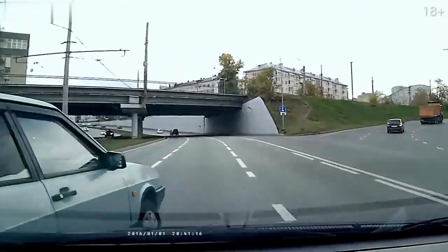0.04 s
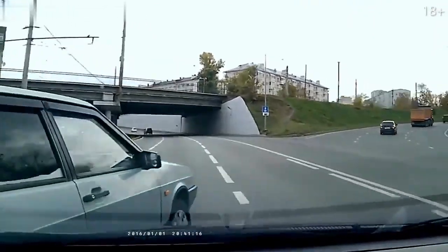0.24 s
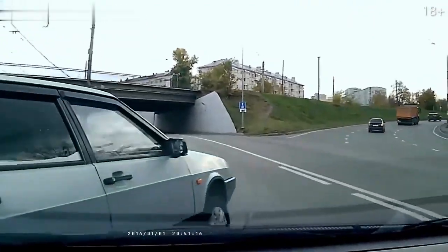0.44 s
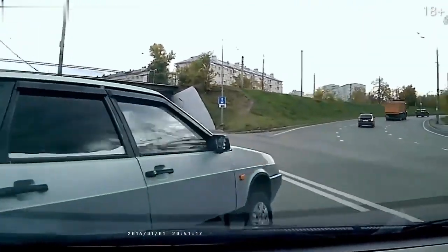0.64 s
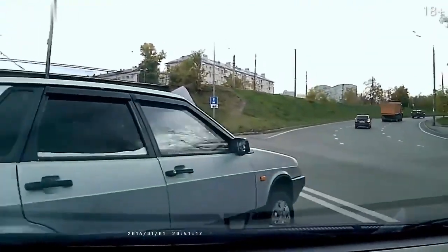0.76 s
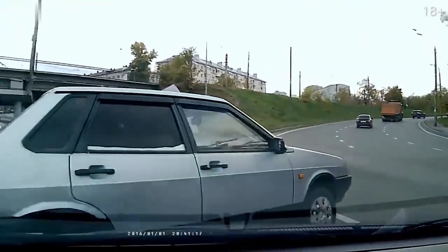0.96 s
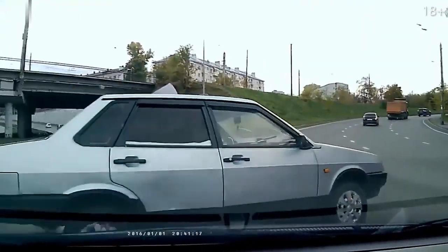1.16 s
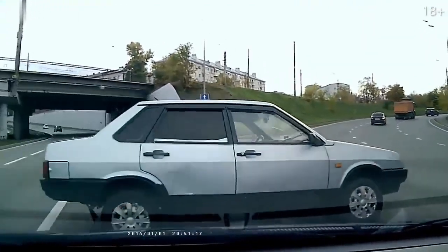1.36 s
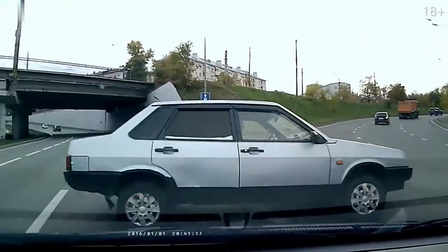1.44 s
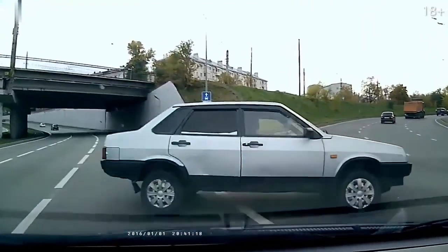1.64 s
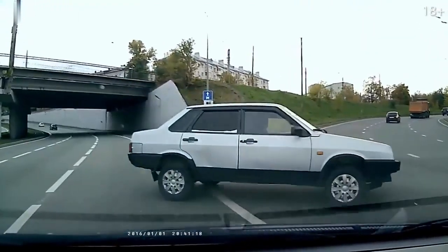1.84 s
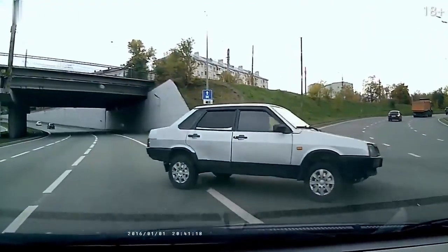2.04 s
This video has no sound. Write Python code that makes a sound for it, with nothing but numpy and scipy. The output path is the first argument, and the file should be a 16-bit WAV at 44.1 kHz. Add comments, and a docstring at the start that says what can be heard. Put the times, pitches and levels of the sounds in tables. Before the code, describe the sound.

A loud collision cuts through the road and engine rumble in a car cabin, crushing metal and snapping plastic with a deep boom that distorts the microphone. Tyres skid and squeal afterwards, with scattered knocks and rattles, gradually easing.

```python
"""Inside a moving car that runs into the side of another and shoves it round.
Over the rumble of road and engine, the bumper crumples, metal panels crush, plastic snaps, the cabin
rings and the body booms, overloading the microphone. Sliding tyres scrub, squeal and judder.
Bent trim knocks and rattles as the cars part, and one small fragment pings."""
import sys
import numpy as np
from scipy import signal
from scipy.fft import rfft, irfft
from scipy.io import wavfile
from scipy.ndimage import uniform_filter1d

SR = 44100
rng = np.random.default_rng(int(sys.argv[2]) if len(sys.argv) > 2 else 0)


def file_out(sig):
    """Save sig as 16-bit WAV at sys.argv[1]."""
    # one column per channel
    cols = np.atleast_2d(sig).T
    # limit, then scale
    lim = np.clip(cols, -1, 1)
    pcm = np.round(lim * 32767).astype(np.int16)
    wavfile.write(sys.argv[1], SR, pcm)


N = 92610  # 2.1 seconds
T = np.arange(N) / SR


def from_db(db):
    """Turn decibels into a number to multiply by."""
    return 10 ** (np.asarray(db) / 20)


def rms_one(x):
    """Scale a signal so its average power is 1."""
    return x / np.sqrt(np.mean(x ** 2) + 1e-20)


def in_time(rows):
    """Join a table's rows with straight lines in time; the first and last values hold."""
    times, *columns = np.transpose(rows)
    return [np.interp(T, times, column) for column in columns]


def drift(rate_hz):
    """A smooth random wobble of about size 1; a higher rate wobbles faster."""
    step, warm_up = 40, 2000
    r = np.exp(-2 * np.pi * rate_hz * step / SR)
    chance = rng.standard_normal(N // step + warm_up + 2)
    slow = signal.lfilter([1], [1, -2 * r, r * r], chance)[warm_up:]
    return np.interp(np.arange(N) / step, np.arange(len(slow)), rms_one(slow))


def colour(x, points):
    """Give a sound its colour: the balance of low and high frequencies drawn by a table."""
    size = 2 ** 17
    hz = np.maximum(np.arange(size // 2 + 1) * SR / size, 1)
    knots, db = np.transpose(points)
    bass_cut = np.minimum(hz / knots[0], 1) ** 2
    gain = rms_one(from_db(np.interp(np.log(hz), np.log(knots), db)) * bass_cut)
    # make the filter ring only after a click, never before it
    cepstrum = irfft(np.log(gain + 1e-9))
    cepstrum[1:size // 2] *= 2
    cepstrum[size // 2 + 1:] = 0
    return irfft(rfft(x, size) * np.exp(rfft(cepstrum)))[:N]


def noise(points):
    """Coloured noise whose slow swells are evened out."""
    x = colour(rng.standard_normal(N), points)
    return x / np.sqrt(uniform_filter1d(x * x, size=4000) + 1e-12)


def grains(per_s, spread_db):
    """Random clicks of uneven size."""
    sizes = from_db(spread_db * np.minimum(rng.exponential(1, N), 4))
    signs = rng.choice([-1, 1], N)
    return rms_one(sizes * signs * (rng.random(N) < per_s / SR))


def strikes(rows):
    """One click for each (time [s], level [dB])."""
    out = np.zeros(N)
    for time, db in rows:
        out[int(time * SR)] += from_db(db)
    return out


def ring(x, hz, ring_s):
    """Each click starts a pure tone that fades by 60 dB in ring_s seconds."""
    r, w = from_db(-60 / (ring_s * SR)), 2 * np.pi * hz / SR
    return signal.lfilter([0, np.sin(w)], [1, -2 * r * np.cos(w), r * r], x + 1e-18)


def burst(start, rise, hold, fade):
    """A loudness shape that rises, then fades from start + hold on; all in seconds."""
    return np.clip((T - start) / rise, 0, 1) * np.exp(-np.maximum(T - start - hold, 0) / fade)


# colour of the cabin rumble: (frequency [Hz], level [dB])
ROAD_COLOUR = [(17, 3), (26, 1.5), (36, -1), (48, 2), (62, -11.5), (85, -20.5), (160, -17.5), (250, -31),
               (340, -22), (480, -38.5), (900, -38), (2000, -52.5), (4500, -63), (6500, -64.5),
               (9000, -74.5), (14000, -70)]
# its loudness: (time [s], level [dB])
ROAD_LOUDNESS = [(0, -28), (.2, -30.5), (.45, -27), (1.2, -26), (1.5, -29), (2.1, -30)]


def road():
    """Road and engine rumble through the cabin."""
    return from_db(in_time(ROAD_LOUDNESS)[0]) * noise(ROAD_COLOUR)


# loudness of the scrubbing tyres: (time [s], rumble level [dB], rasp level [dB])
SCRUB_LOUDNESS = [(.22, -32, -74), (.36, -24.5, -50.5), (.49, -36, -43), (.58, -26.5, -38), (.8, -26, -38),
                  (1.05, -28.5, -41.5), (1.25, -29, -39.5), (1.5, -34.5, -45), (1.72, -34, -41.5),
                  (1.88, -39, -48.5), (2.1, -47, -51.5)]
# colours of the rumble and the rasp: (frequency [Hz], level [dB])
RUMBLE_COLOUR = [(50, -1), (90, 7), (125, 13), (165, 6.5), (210, 8), (270, -10.5), (350, -10), (480, -28),
                 (800, -57)]
RASP_COLOUR = [(300, 1), (520, 3), (750, 1), (1100, 0), (1300, -3), (1600, -6.5), (2200, -19),
               (2900, -14.5), (4000, -27), (5000, -40.5), (7000, -67), (14000, -62.5)]


def scrub():
    """Rubber on asphalt rumbles from the start and adds a gritty rasp as it is dragged sideways."""
    rumble_db, rasp_db = in_time(SCRUB_LOUDNESS)
    rumble = from_db(rumble_db) * noise(RUMBLE_COLOUR)
    grit = from_db(rasp_db) * grains(per_s=6000, spread_db=1.0)
    return rumble + colour(grit, RASP_COLOUR)


# colour of the crumpling bumper: (frequency [Hz], level [dB])
CRUMPLE_COLOUR = [(250, 9), (700, 0.5), (1400, -4), (2200, -7.5), (3400, -7.5), (4600, -28), (7000, -38),
                  (14000, -41)]


def bumper():
    """The bumper crumples with a light crackle at the first touch."""
    level = from_db(-30.5) * burst(start=.208, rise=.0074, hold=.026, fade=.0094)
    return colour(level * grains(per_s=3500, spread_db=0.5), CRUMPLE_COLOUR)


# loudness of the buckling metal: (time [s], level [dB])
BUCKLE_LOUDNESS = [(.205, -63.5), (.216, -33.5), (.228, -30), (.238, -22.5), (.2455, -4), (.251, -7),
                   (.256, -14.5), (.261, -9.5), (.268, -22.5), (.285, -25), (.32, -32), (.37, -36),
                   (.48, -61.5), (.6, -76)]
# its colour: (frequency [Hz], level [dB])
BUCKLE_COLOUR = [(90, -8), (150, -4), (280, 5.5), (400, -0.5), (750, -1.5), (1100, -0.5), (1600, -8.5),
                 (2000, -20), (2800, -20), (4500, -30.5), (8000, -41.5), (14000, -48)]


def crush():
    """Sheet metal buckles in dense clicks; they and the hardest hit set the cabin ringing."""
    buckles = from_db(in_time(BUCKLE_LOUDNESS)[0]) * grains(per_s=1800, spread_db=2.0)
    ringing = from_db(-10) * buckles.std() * rms_one(cabin_ring(buckles))
    hardest_hit = strikes([(.2445, -24.5)])
    return colour(buckles, BUCKLE_COLOUR) + ringing + cabin_ring(hardest_hit)


# cabin resonances, the tones it rings at: (pitch [Hz], level [dB], ring time [s])
CABIN_TONES = [(281, 8.5, 0.19), (346, 4, 0.41), (437.7, 0, 0.32), (498, -9, 0.1), (519, -3, 0.45),
               (674, 10, 0.13), (752, 9.5, 0.19), (905, 2, 0.16), (961, 12, 0.093), (1218, -34, 0.067),
               (1227, -4.5, 0.4), (1537, -9, 0.1), (1750, -15, 0.36), (2300, -9.5, .1), (2930, 2, .08)]


def cabin_ring(hits):
    """The crash sets off ringing tones in the cabin; every second tone starts the opposite way."""
    return sum(from_db(db) * ring(hits, hz, ring_s) * (-1) ** k
               for k, (hz, db, ring_s) in enumerate(CABIN_TONES))


# plastic breaking: (time [s], level [dB])
PLASTIC_SNAPS = [(.2165, -46), (0.227, -45), (0.2353, -15.5), (0.2438, -18), (0.257, -27), (.2645, -35),
                 (0.273, -30)]
# colour of a snap: (frequency [Hz], level [dB])
PLASTIC_COLOUR = [(1500, 9.5), (4000, -13), (5800, -6), (8000, -25), (11000, -9), (13500, -10),
                  (14500, -9.5)]


def snaps():
    """Brittle plastic breaks with short, bright cracks."""
    level = sum(from_db(db) * burst(time, rise=.00035, hold=.00065, fade=.0025)
                for time, db in PLASTIC_SNAPS)
    return colour(level * rng.standard_normal(N), PLASTIC_COLOUR)


# heavy blows on the car body: (time [s], level [dB])
BODY_BLOWS = [(.235, -15), (.2505, -7.5), (.276, -14.5), (.296, -12.5), (.322, -13)]
# the body's deep tones: (pitch [Hz], level [dB], ring time [s])
BODY_TONES = [(23.8, -3, 0.17), (36.9, 3, .3), (72.3, -3, 0.21), (99, -11, .25), (123.9, -7, 0.57),
              (138.7, -9.5, 0.58), (197, -30.5, 0.22)]


def boom(soften_above_hz=300):
    """Soft, heavy blows shake the body and the cabin air."""
    soften = signal.butter(1, soften_above_hz, fs=SR, output="sos")
    push = signal.sosfilt(soften, strikes(BODY_BLOWS) + 1e-18)
    return sum(from_db(db) * ring(push, hz, ring_s) for hz, db, ring_s in BODY_TONES)


# course of the squeal: (time [s], base pitch [Hz], level [dB], overtone boost [dB])
SQUEAL_PATH = [(.3, 1100, -65, -19), (.4, 1092, -44.5, -0.5), (.55, 1077, -47.5, -23),
               (.85, 1124, -41, -9.5), (1.08, 1070, -42, -3), (1.2, 966, -43, 3.5), (1.28, 1110, -37.5, -2),
               (1.34, 1100, -39.5, -3), (1.42, 958, -43.5, 6), (1.58, 944.5, -42.5, -0.5),
               (1.72, 913.6, -37.5, -7), (1.84, 959, -45.5, -3), (1.92, 978, -41, -7),
               (2.02, 1020, -46.5, -7.5), (2.1, 984, -49, -8)]
# ribs of the tyre tread: (pitch [times the base pitch], level [dB])
TREAD_RIBS = [(1, 1.5), (0.88, -3), (1.045, -10), (.89, -9)]
# tones at 1, 2, 3 and 4 times a rib's pitch: (level [dB])
RIB_HARMONICS = [-2.5, -11, -15.5, -29]


def squeal():
    """Tread ribs stick and slip on the road, each singing at its own unsteady pitch."""
    hz, db, boost_db = in_time(SQUEAL_PATH)
    out = 0
    for ratio, rib_db in TREAD_RIBS:
        wobble = 1 + .022 * drift(rate_hz=220) + .011 * drift(rate_hz=18)
        phase = 2 * np.pi * np.cumsum(hz * ratio * wobble) / SR
        tone = sum(from_db(level + boost_db * (k > 0)) * np.sin((k + 1) * phase)
                   for k, level in enumerate(RIB_HARMONICS))
        flutter_db = 4.5 * drift(rate_hz=68)
        out += tone * from_db(db + rib_db + flutter_db)
    return out


# knocks of bent trim: (time [s], clatter level [dB], clunk level [dB], rise [s], hold [s], fade [s])
TRIM_KNOCKS = [(0.493, -47, -42, 0.0011, 0.0053, 0.0058), (1.076, -41, -62, 0.0013, 0.0033, 0.015),
               (1.109, -51, -54, 0.0016, .003, 0.0089), (1.171, -37, -19, 0.0013, 0.0065, 0.011),
               (1.212, -69, -31, 0.0022, 0.014, 0.015), (1.359, -38.5, -17.5, 0.0027, 0.0096, 0.012),
               (1.382, -43, -30, 0.0022, .005, 0.01), (1.425, -38, -29, 0.011, 0.037, 0.016),
               (1.613, -51.5, -36.5, 0.0099, 0.034, 0.017), (1.713, -36.5, -32, 0.0042, 0.018, 0.016),
               (1.756, -48, -41.5, 0.015, .025, 0.026), (1.795, -42, -42, 0.0094, 0.028, 0.011),
               (1.851, -46, -44, 0.0078, .016, 0.014), (1.925, -37, -42, 0.0037, 0.0094, 0.014),
               (2.038, -49.5, -41, 0.0054, 0.012, 0.01)]
# colours of the clatter and the clunk: (frequency [Hz], level [dB])
CLATTER_COLOUR = [(700, 7), (1600, 0), (3000, -8), (4200, -9), (5500, -13), (7700, -21), (9500, -16.5),
                  (12000, -21.5), (15000, -20)]
CLUNK_COLOUR = [(100, -11), (200, 2.5), (350, 4), (480, 1.5), (700, -7.5), (1200, -14), (2500, -24),
                (4000, -32.5), (7000, -48)]


def knocks(rattles_per_s=2200):
    """Bent trim knocks: each time a dull clunk with a bright clatter of tiny hits."""
    clatter_level = clunk_level = 0
    for time, clatter_db, clunk_db, rise, hold, fade in TRIM_KNOCKS:
        shape = burst(time, rise, hold, fade)
        clatter_level += from_db(clatter_db) * shape
        clunk_level += from_db(clunk_db) * shape
    clatter = colour(clatter_level * grains(rattles_per_s, spread_db=0.5), CLATTER_COLOUR)
    clunk = colour(clunk_level * grains(rattles_per_s, spread_db=2.0), CLUNK_COLOUR)
    return clatter + clunk


# hops of a tyre: (middle time [s], pitch [Hz], level [dB], half length [s])
TYRE_HOPS = [(0.926, 118, -23.5, 0.015), (0.962, 204, -19, 0.017), (1.159, 145, -16.5, 0.012),
             (1.244, 205, -23, 0.012), (1.339, 130, -13.5, 0.007), (1.375, 158.9, -6, 0.0071),
             (1.398, 140, -20.5, 0.0069), (1.592, 198, -19, 0.013), (1.635, 124, -18, 0.026),
             (1.827, 124, -19.5, 0.015)]


def judders():
    """A sliding tyre grips and hops, making short, low hoots that swell and fade."""
    out = 0
    for time, hz, db, half_length in TYRE_HOPS:
        wobble = 1 + .0294 * drift(rate_hz=26.7)
        phase = 2 * np.pi * np.cumsum(hz * wobble) / SR
        swell = np.exp(-.5 * ((T - time) / half_length) ** 2)
        out += from_db(db) * swell * np.sin(phase)
    return out


def ping(time_s=1.078, level_db=-43):
    """A small, hard fragment rings briefly."""
    return ring(strikes([(time_s, level_db)]), hz=4100, ring_s=.035)


def scene():
    """All the sounds added up in one channel, as they reach the windscreen."""
    collision = bumper() + crush() + boom() + snaps()
    return (road() + collision + knocks() + ping() + scrub() + squeal() + judders())[None]


def record(dry, ceiling=0.38, dull_above_hz=14300, cut_above_hz=16500):
    """The overloaded microphone flattens the loudest peaks, and the highest treble is lost."""
    clipped = dry / (1 + (dry / ceiling) ** 12) ** (1 / 12)
    dulled = signal.sosfilt(signal.butter(6, dull_above_hz, fs=SR, output="sos"), clipped)
    return signal.sosfilt(signal.cheby2(14, 70, cut_above_hz, fs=SR, output="sos"), dulled)


dry = scene()
out = record(dry)
file_out(out)
```